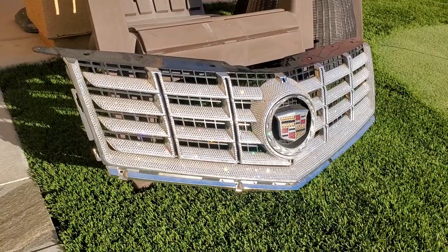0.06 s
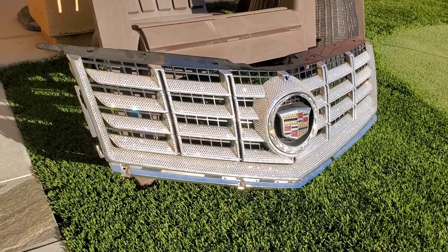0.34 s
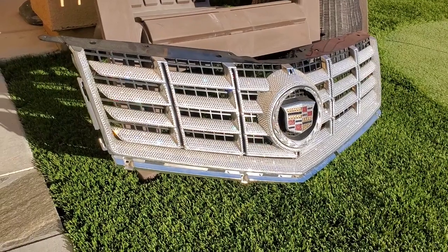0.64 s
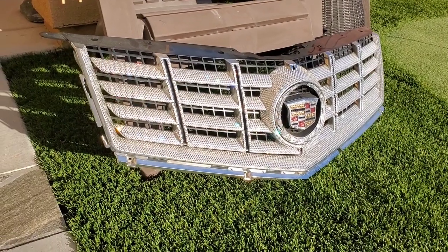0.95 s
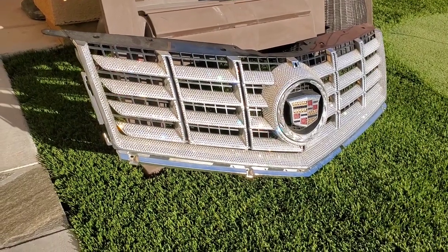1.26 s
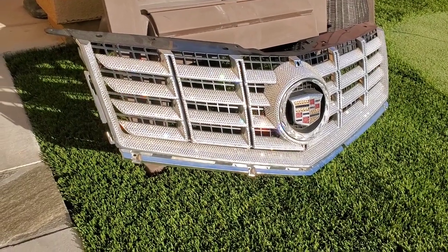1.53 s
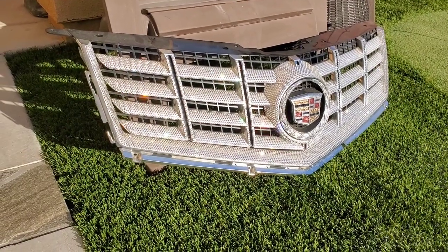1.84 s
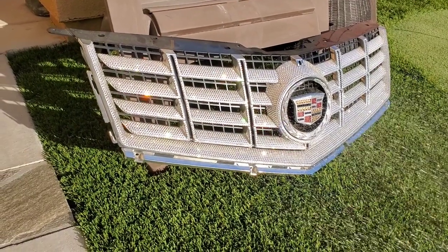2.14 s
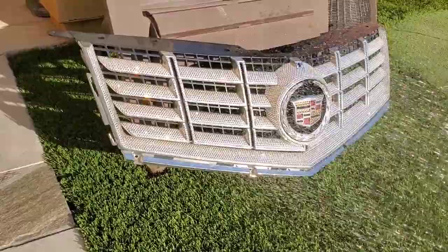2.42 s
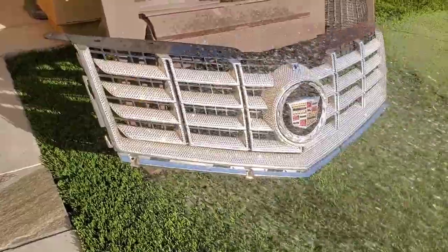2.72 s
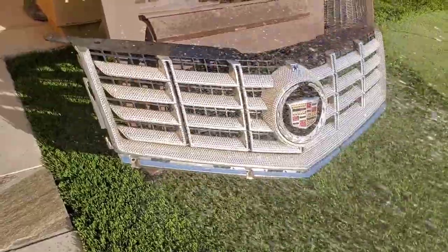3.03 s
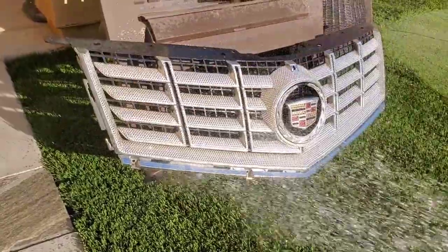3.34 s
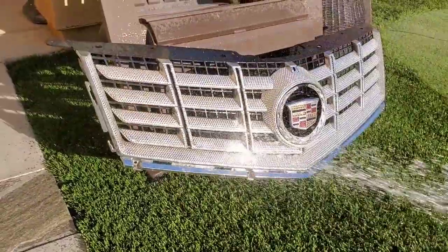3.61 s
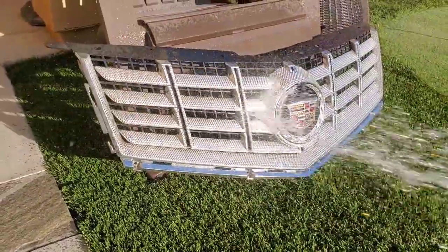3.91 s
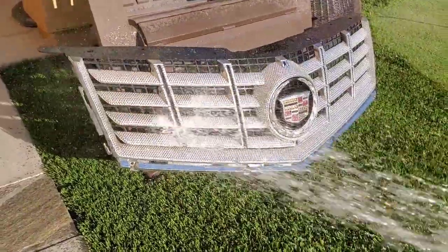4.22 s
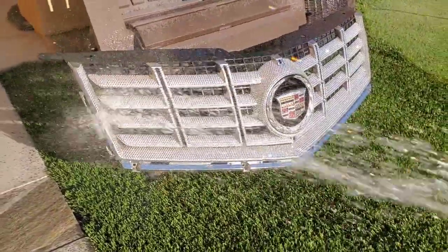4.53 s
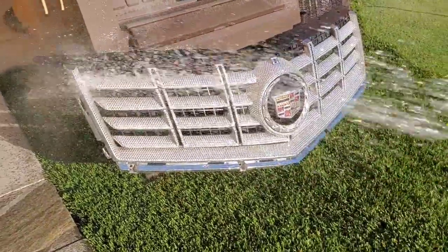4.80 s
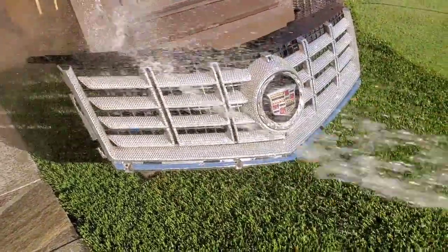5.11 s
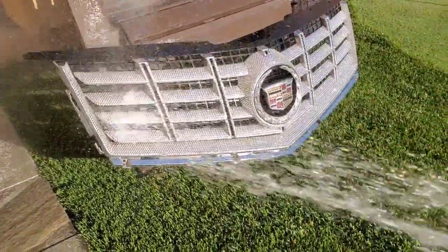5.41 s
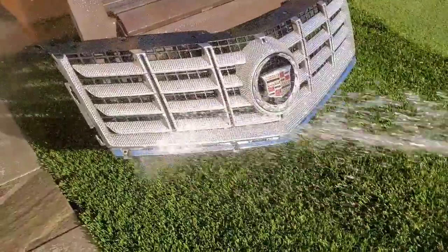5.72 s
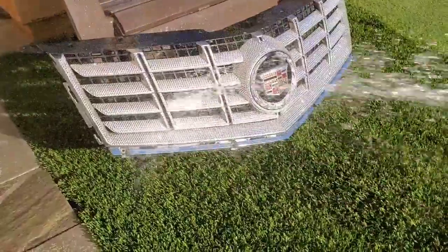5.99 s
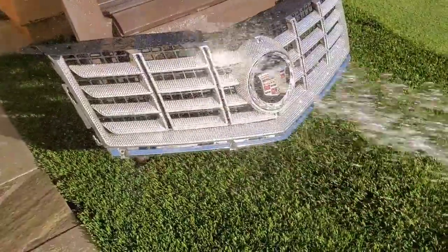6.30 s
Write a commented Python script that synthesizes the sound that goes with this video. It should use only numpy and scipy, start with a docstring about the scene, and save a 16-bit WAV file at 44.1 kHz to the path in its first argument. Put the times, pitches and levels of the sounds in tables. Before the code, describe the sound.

At first there is only light wind on the microphone and distant traffic, with a very faint rustle of a hand on a hose. At about 0.9 seconds a nozzle, close and to the right, spits and sputters. The hose whistles faintly, spurts sharply at 1.4 seconds, then hums low until about 1.8. A soft shower patters on artificial turf under a fizzy mist, slowly growing. At 2.7 seconds the nozzle turns with a hissing spurt and a momentary break, and the spray continues finer. Around 3.4 seconds more spurts lead into a narrow jet with a high, almost whistling hiss. By 4 seconds it lands fully on a hollow plastic car grille, louder, pulsing as it sweeps, splattering on the slats and drumming in the gaps. A few big drops tick sharply between 4.1 and 5.3 seconds. The jet continues until the end, at about 6.4 seconds.

```python
"""A yard with artificial turf; a stereo microphone stands close to a garden hose, nozzle to its right.
The valve opens, the hose sings briefly, and the nozzle spurts as it turns through three settings.
A soft shower patters on the turf under a fizz of mist; then a narrow jet sweeps over a hollow
plastic car grille, hissing on the slats and drumming in the gaps between them.
Behind it all, light air on the microphone and traffic in the distance."""
import sys
import numpy as np
from scipy import signal
from scipy.fft import rfft, irfft
from scipy.io import wavfile
from scipy.ndimage import uniform_filter1d

SR = 44100
rng = np.random.default_rng(int(sys.argv[2]) if len(sys.argv) > 2 else 0)


def unload_wav(signal):
    """Save mono or channel-first audio to the path in sys.argv[1] as 16-bit WAV at rate SR, clipped to [-1, 1]."""
    wavfile.write(
        sys.argv[1],
        SR,
        np.round(np.clip(np.atleast_2d(signal).T, -1, 1) * 32767).astype(np.int16),
    )


N = 280035
TIME, HZ = np.arange(N) / SR, np.fft.rfftfreq(N, 1 / SR)

# resonances of the plastic grille: f/Hz, width/Hz, boost/dB
GRILLE_MODES = [(203, 28, 3.5), (290, 33, 2), (430, 36, 2), (2025, 91, 5.5), (13600, 500, 2.5)]
# the splash moves across the microphone as the jet sweeps: t/s, left minus right/dB
JET_PAN = [(3.45, -3.5), (3.8, 0.5), (4.2, -0.5), (4.7, -1.5), (5.2, -3), (5.7, -0.5), (6.3, -2)]
# the jet catches a gap between slats: t/s, half-length/s, ring level/dB, f/Hz, half-width/Hz, thud/dB
GAP_SPLATS = [(3.702, .025, -33, 3300, 1200, -60), (3.92, 0.087, -31, 3600, 1500, -58),
              (4.065, 0.037, -28.5, 2500, 1100, -44), (4.221, 0.027, -26, 2550, 800, -47),
              (4.379, 0.056, -32.5, 2340, 900, -54), (4.475, 0.024, -30.5, 1874, 180, -52),
              (4.523, 0.028, -28.5, 2440, 350, -50), (4.743, 0.038, -31.5, 2700, 1300, -55),
              (4.796, 0.019, -29.5, 2020, 300, -35), (5.034, 0.037, -35, 2200, 1400, -35.5),
              (5.22, .026, -29.5, 1670, 1190, -37.5), (5.399, .015, -35, 2110, 120, -55),
              (5.471, 0.013, -30, 2560, 1500, -33.5), (5.93, 0.02, -26.5, 2300, 900, -45),
              (6.327, .012, -32, 1730, 130, -50)]
# single big drops: t/s, level/dB, left minus right/dB
BIG_DROPS = [(2.636, -24, -10), (2.8754, -40, -19.5), (2.968, -27, -13), (4.1396, -7, 1), (4.761, -14, -4),
             (4.997, -10, -7), (5.14, -15, -14), (5.341, -20, -1)]
# flow through the shower head, one curve for each setting: t/s, level/dB
SHOWER_FLOW = [
    [(0.98, -43), (1.186, -60.5), (1.29, -48.5), (1.312, -39), (1.34, -38.5)],
    [(1.42, -36.5), (1.648, -36), (2.606, -29.5), (2.7, -30.5)],
    [(2.8, -36.5), (3.102, -34.5), (3.192, -36), (3.42, -35.5)],
]
# spurts as the nozzle turns: t/s, level/dB, rise/s, hold/s, decay/s, narrowness of the opening (0-1)
NOZZLE_SPURTS = [(0.916, -25, 0.0087, 0.014, 0.013, 0.22), (0.94, -29, 0.0013, .002, 0.0054, 0.),
                 (0.96, -38, .01, .02, 0.067, 0.), (1.055, -39, .002, .002, 0.0032, 0.1),
                 (1.3654, -18, 0.0043, 0.0022, 0.0098, 0.4), (1.384, -38, .01, .015, .02, .6),
                 (2.709, -19.7, .014, 0.037, 0.041, 0.84), (3.439, -23.5, .016, .018, 0.024, 0.6),
                 (3.498, -25, 0.037, 0.06, 0.034, .85)]
# the hose whistles, then hums, as the flow picks up: t/s, f/Hz, level/dB
HOSE_WHISTLE = [(1.07, 477, -60), (1.11, 493, -51), (1.146, 516, -62), (1.176, 533, -50.5),
                (1.312, 524, -53), (1.36, 537, -75)]
HOSE_HUM = [(1.51, 228, -62), (1.545, 213.6, -37.5), (1.585, 188.5, -31), (1.63, 186.3, -32),
            (1.70, 187, -39), (1.77, 192, -50)]
# the hose is taken in hand: t/s, half-length/s, level/dB
HAND_RUSTLES = [(.335, 0.0046, -67), (.395, .04, -69), (0.635, .007, -66)]
# spectrum of each source at the microphone: f/Hz, relative level/dB
JET_SPECTRUM = [(30, -11), (80, -8), (450, -12), (800, -11.5), (1400, -12), (2000, -10.5), (2800, -9.5),
                (4800, 2.5), (5900, -1), (7200, -1.5), (8600, -10.5), (11200, -6.5), (12500, -2),
                (15700, -2)]
SHOWER_SPECTRUM = [(30, -2), (90, 0), (230, 3), (380, 0), (720, 0), (1200, -6.5), (2100, -7), (3100, -9),
                   (4300, -6.5), (6700, -9.5), (8200, -16), (10900, -17), (12400, -5.5), (14000, -4),
                   (15800, -12.5)]
WIDE_SPECTRUM = [(200, -14), (500, -8.5), (1000, -9), (2000, -9.5), (3200, -6), (5000, -3.5), (6600, 5.5),
                 (7400, -1), (8600, -4), (10800, -7), (12400, 1), (15800, -3.5)]
NARROW_SPECTRUM = [(200, -44), (1500, -22.5), (5000, -22), (7000, -1.5), (9500, -2), (10900, -7),
                   (12400, 11), (14200, 8), (15800, -4)]
YARD_SPECTRUM = [(20, -4), (40, -5.5), (70, 2.5), (140, -2.5), (200, -6), (420, -17), (850, -10.5),
                 (1400, -22), (2050, -24), (3000, -32.5), (4400, -28.5), (5300, -33.5), (7000, -34),
                 (8500, -50), (15800, -51)]
# how each place reaches the two capsules: f/Hz, left minus right/dB, coherence (0-1)
FROM_NOZZLE = [(100, -8.5, 1), (500, -6.5, 0.65), (1810, -4, 0.74), (4000, -5, 0.52), (5740, -9, 0.31),
               (7060, -2, 0.3), (9300, -7, 0.1), (10700, -2, 0.071), (12300, -16, 0.18), (15500, -9, 1)]
FROM_YARD = [(30, 0, .1), (60, -0.31, 0.82), (254, 1, 0.9), (700, 1, 0.093), (8000, -2, .1)]
# the same for the grille, with a fourth column: left phase lead/rad
FROM_GRILLE = [(100, -9, 1, -1), (448, -6.5, 0.89, -1), (900, -6.5, 0.11, 0.4), (1090, -1, 0.14, 1.06),
               (1970, -1, 0.45, 1.0), (3220, 1, 0.38, 2.5), (5070, -5.5, 0.25, 0.5),
               (6050, -8.5, 0.24, 2.8), (7240, 0, 0.077, -3), (9600, -5, 0.1, -3.5),
               (15500, -3.5, 0.053, -0.5)]

NOZZLE_LAG_S = 0.000465  # the left capsule hears the nozzle later
CUT_S, CUT_LENGTH_S, CUT_DB = 2.748, 0.021, -16  # the turning head blocks the shower for an instant
JET_S, JET_BUILD_S = 3.44, 0.54  # the jet forms, then takes a while to land fully on the grille
WAG_HZ, WAG_PEAK_S = 4.21, 5.045  # the hand wags the jet to and fro across the slats
MISS_S, MISS_LENGTH_S = 5.14, 0.082  # the jet slips past the edge of the grille


def jet(gap_db=3.5, pings_db=-6):
    """The jet breaks into slugs that thud on the grille, ring its gaps and shatter into hiss."""
    body = gain_of(sum(db / (1 + (2 * (HZ - hz) / width) ** 2) for hz, width, db in GRILLE_MODES))
    landing = np.clip((TIME - JET_S) / JET_BUILD_S, 0, 1)
    wag = landing * np.cos(2 * np.pi * WAG_HZ * (TIME - WAG_PEAK_S))

    def on_grille(water):
        """Water heard through the resonances of the grille."""
        return place(irfft(rfft(water) * body, N), JET_SPECTRUM, FROM_GRILLE)

    def force(landed_db, first_db, wag_db, miss_db, rise_s):
        """A layer grows as the jet lands, pulses with the hand and drops where the jet misses."""
        aim_db = first_db * (1 - landing) + wag_db * wag + miss_db * swell(MISS_S, MISS_LENGTH_S)
        return gain_of(landed_db + aim_db - 60 * np.maximum(JET_S - TIME, 0) / rise_s)

    def gaps(hz, t):
        """The gap under the jet resonates, and its water film keeps changing."""
        gap_hz = np.interp(t, [3.85, 4.45], [3800, 2200])  # lower as the jet moves from the turf onto the grille
        octaves_off = np.log2((hz + 1) / gap_hz)
        return gap_db / (1 + octaves_off ** 2) + 1.63 * patches(hz, t, width_hz=1500, length_s=0.13)

    def flutter(hz, t):
        """The stream wobbles, so the hiss flutters as a whole and in narrow patches."""
        whole = patches(hz, t, width_hz=27000, length_s=0.058)
        return .9 * whole + 2.1 * patches(hz, t, width_hz=400, length_s=.03)

    slugs = on_grille(drops(per_s=970, spread_db=-0.5, splash_s=0.00066, wash=1))
    splash = on_grille(drops(per_s=2900, spread_db=2.5, splash_s=0.00027, wash=1))
    hollow = unit(shaped(band(slugs, 1200, 3850) + gain_of(pings_db) * air_pockets(), gaps))
    drum = hollow * force(-32, first_db=-6, wag_db=-0.2, miss_db=-6, rise_s=0.16)
    blow_power = sum((gain_of(db) * swell(s, length_s)) ** 2 for s, length_s, *_, db in GAP_SPLATS)
    push = force(-40.5, first_db=-6.5, wag_db=1.5, miss_db=0, rise_s=0.11)
    thud = band(slugs, 54, 1210) * np.sqrt(blow_power + push ** 2)
    spray = band(shaped(splash, flutter), 6080, 13500)
    hiss = spray * force(-25.5, first_db=-3.5, wag_db=0.9, miss_db=-2, rise_s=0.75)
    pan_db = np.interp(TIME, *np.transpose(JET_PAN))
    return (thud + drum + hiss) * gain_of(np.array([pan_db, -pan_db]) / 2)


def air_pockets(count=40, each_per_s=7, spread_db=3, ring_s=0.016, low_hz=1650, high_hz=4600):
    """Air shut in between slats and water pings, each pocket at its own pitch; high ones die sooner."""
    t, out = np.arange(SR // 16) / SR, np.zeros((2, N))
    attack = 1 - np.exp(-t / 0.00018)
    for hz in np.geomspace(low_hz, high_hz, count):
        size = gain_of(spread_db * np.minimum(rng.exponential(1, N), 3))
        hits = size * (rng.random(N) < each_per_s / SR)
        left_lead = np.array([[0.49 + 0.28 * rng.standard_normal()], [0]])
        ring = np.sin(2 * np.pi * hz * t + left_lead) * np.exp(-t * hz / low_hz / ring_s) * attack
        out += signal.oaconvolve(hits[None], ring, axes=1)[:, :N]
    return unit(out * gain_of([[-1.5], [0]]))


def splats():
    """A slug of water fills one gap of the grille, which rings for a moment."""
    water = place(drops(per_s=900, spread_db=1.8, splash_s=0.00044, wash=1), JET_SPECTRUM, FROM_GRILLE)
    spectrum = rfft(band(water, 1300, 4500))
    out = np.zeros((2, N))
    for s, length_s, db, pitch_hz, width_hz, _ in GAP_SPLATS:
        ring = irfft(spectrum / (1 + ((HZ - pitch_hz) / width_hz) ** 2), N)
        out += gain_of(db) * unit(ring) * swell(s, length_s)
    return out


def bore(settled_hz=5917, sharp_hz=300, settle_s=.45, width_hz=800, octave_db=-17):
    """Fast water in the narrow bore makes a focused, almost whistling hiss with a weak octave."""
    def resonance(hz, t):
        """Two steep peaks that sink as the opening clears."""
        pitch_hz = settled_hz + sharp_hz * np.exp(-np.maximum(t - JET_S, 0) / settle_s)
        first, octave = (1 / (1 + ((hz - k * pitch_hz) / width_hz) ** 2) ** 2 for k in (1, 2))
        peaks_db = 20 * np.log10(first + gain_of(octave_db) * octave)
        return peaks_db - 2 * patches(hz, t, width_hz=91, length_s=0.037)

    water = drops(per_s=2300, spread_db=3, splash_s=0.00035, wash=0.98)
    rush = place(water, JET_SPECTRUM, FROM_GRILLE)
    # soft while the head is still turning, full once the jet has landed
    opening = level(s=[3.31, JET_S, JET_S + 0.045, JET_S + JET_BUILD_S, TIME[-1]],
                    db=[-37, -37, -31.5, -31, -31], rise_s=0.22, fall_s=1)
    return unit(shaped(rush, resonance)) * opening


def snaps(decay_s=0.00076):
    """Single large drops burst with a sharp tick."""
    bursts = np.zeros((2, N))
    for s, db, pan_db in BIG_DROPS:
        sides = gain_of(db + np.array([[pan_db], [-pan_db]]) / 2)
        bursts += sides * (TIME >= s) * np.exp(-abs(TIME - s) / decay_s)
    crack = irfft(rfft(rng.standard_normal((2, N))) * gain_of(over_hz(WIDE_SPECTRUM)[0]), N)
    return bursts * band(crack, 3800, 19000)


def shower(patter_db=-2.5):
    """Many soft drops land on the turf: a dull patter with a sizzle above it, both following the flow."""
    rain = at_nozzle(drops(per_s=2800, spread_db=1, splash_s=0.00013, wash=1.9), SHOWER_SPECTRUM)
    rain = shaped(rain, lambda hz, t: 0.85 * patches(hz, t, width_hz=590, length_s=0.026))
    landed = np.interp(TIME, [.9, 1.5], [.6, 1])  # the first water takes a while to reach the ground
    patter = gain_of(patter_db) * landed * band(rain, 44, 780)
    sizzle = band(rain, 1030, 8200)
    flow = level(*np.vstack(SHOWER_FLOW).T, rise_s=0.41, fall_s=0.1)
    blocked = gain_of(CUT_DB * swell(CUT_S, CUT_LENGTH_S))
    return flow * blocked * (patter + sizzle)


def mist(leak_s=0.833, leak_db=-48.5, spray_db=-31, growth=1.2, finer_db=2, body_db=-9):
    """Fine spray tears off the nozzle with a prickly hiss: a steady leak, more as the flow grows."""
    s, flow_db = np.vstack(SHOWER_FLOW).T
    fizz = at_nozzle(drops(per_s=2500, spread_db=4, splash_s=.0003, wash=1.5), SHOWER_SPECTRUM)
    leak = level([leak_s, JET_S], [leak_db, leak_db], rise_s=.17, fall_s=.1)
    turned = TIME > CUT_S
    torn = level(s, spray_db + growth * (flow_db - flow_db.max()), rise_s=.1, fall_s=.2)
    torn *= gain_of(finer_db * turned)
    body = gain_of(body_db) * (leak + torn * turned) * band(fizz, 2460, 4900)
    return band(fizz, 7700, 18000) * np.hypot(leak, torn) + body


def spurts(sputter_db=1.5):
    """Water squeezes through a half-open port: the narrower it is, the higher the hiss."""
    spit = drops(per_s=900, spread_db=1.5, splash_s=.0007, wash=.6)
    spit *= gain_of(sputter_db * wobble(samples=200))  # air in the line
    wide = at_nozzle(spit, WIDE_SPECTRUM) * gain_of([[1.5], [-.5]])
    narrow = at_nozzle(spit, NARROW_SPECTRUM) * gain_of([[-4.5], [.8]])
    out = np.zeros((2, N))
    for s, db, rise_s, hold_s, decay_s, narrowness in NOZZLE_SPURTS:
        rise = np.clip((TIME - s) / rise_s, 0, 1)
        decay = np.exp(-np.maximum(TIME - s - rise_s - hold_s, 0) / decay_s)
        out += gain_of(db) * rise * decay * ((1 - narrowness) * wide + narrowness * narrow)
    return out


def hose_tone(curve, waver=.01):
    """Flow through the valve sets a slightly unsteady pure tone going in the hose."""
    s, hz, db = np.transpose(curve)
    pitch_hz = np.interp(TIME, s, hz) * (1 + waver * wobble(samples=400))
    lag_turns = np.array([[NOZZLE_LAG_S], [0]]) * hz.mean()
    tone = np.sqrt(2) * np.sin(2 * np.pi * (np.cumsum(pitch_hz) / SR - lag_turns))
    return tone * level(s, db, rise_s=0.074, fall_s=.08) * gain_of([[-2], [2]])


def rustles():
    """A hand takes up the hose: dry little scrapes before the water comes."""
    grit = place(drops(per_s=500, spread_db=6, splash_s=.0006, wash=.6), SHOWER_SPECTRUM, FROM_YARD)
    touches = sum(gain_of(db) * swell(s, length_s) for s, length_s, db in HAND_RUSTLES)
    return band(grit, 3200, 9500) * touches


def yard(level_db=-48, gust_db=2):
    """Light air on the microphone, in small gusts, and far traffic."""
    def gusts(hz, t):
        """The gusts stir mostly the low end."""
        return gust_db * patches(hz, t, width_hz=1100, length_s=0.18) / (1 + hz / 500)

    air = place(rng.standard_normal((2, N)), YARD_SPECTRUM, FROM_YARD)
    return gain_of(level_db) * shaped(air, gusts)


def drops(per_s, spread_db, splash_s, wash):
    """Drops of uneven size, each a tiny noise burst, over a wash of countless finer ones."""
    size = gain_of(spread_db * np.minimum(rng.exponential(1, N), 5))
    hits = size ** 2 * (rng.random(N) < per_s / SR)
    power = signal.lfilter([1], [1, -np.exp(-1 / (splash_s * SR))], hits)
    return np.sqrt(wash + power / power.mean()) * rng.standard_normal((2, N))


def place(pair, spectrum, path, lag_s=0):
    """Colours two unrelated signals and spreads them over the capsules, at unit level."""
    balance_db, coherence, *lead = over_hz(path)
    balance = gain_of(balance_db)
    right, unrelated = rfft(pair)
    turn = np.exp(1j * (sum(lead) - 2 * np.pi * HZ * lag_s))
    left = (coherence * right + np.sqrt(1 - coherence ** 2) * unrelated) * turn * balance
    colour = gain_of(over_hz(spectrum)[0]) / np.hypot(1, balance)
    return unit(irfft(np.array([left, right]) * colour, N))


def at_nozzle(pair, spectrum):
    """Places a sound close by, to the right of the microphone."""
    return place(pair, spectrum, FROM_NOZZLE, NOZZLE_LAG_S)


def over_hz(table):
    """Each column of a table, interpolated over log frequency."""
    hz, *columns = np.transpose(table)
    return [np.interp(np.log(HZ + 1), np.log(hz + 1), column) for column in columns]


def band(pair, low_hz, high_hz):
    """One band of a pair, at unit level."""
    power = 1 / (1 + (low_hz / (HZ + 1)) ** 10) / (1 + ((HZ + 1) / high_hz) ** 10)
    return unit(irfft(rfft(pair) * np.sqrt(power), N))


def shaped(pair, field_db):
    """Applies a gain that is a function of frequency and time."""
    hz, s, frames = signal.stft(pair, SR, nperseg=512, noverlap=384)
    frames *= gain_of(field_db(hz[:, None], s))
    return signal.istft(frames, SR, nperseg=512, noverlap=384)[1][:, :N]


def patches(hz, s, width_hz, length_s):
    """Smooth random patches over frequency and time, of rms 1."""
    shape = len(hz), len(s)
    noise = np.fft.rfft2(rng.standard_normal(shape))
    across = np.fft.fftfreq(len(hz), hz[1, 0])[:, None] * width_hz
    along = np.fft.rfftfreq(len(s), s[1]) * length_s
    return evened(np.fft.irfft2(noise / (1 + (2 * across) ** 2 + (2 * along) ** 2), shape))


def wobble(samples):
    """Noise smoothed over so many samples, of rms 1."""
    return evened(uniform_filter1d(rng.standard_normal(N), samples))


def level(s, db, rise_s, fall_s):
    """Gain along a dB curve; outside it the sound fades by 60 dB in the given times."""
    outside = np.maximum(s[0] - TIME, 0) / rise_s + np.maximum(TIME - s[-1], 0) / fall_s
    return gain_of(np.interp(TIME, s, db) - 60 * outside)


def swell(s, length_s):
    """A smooth bump of height 1 around a moment."""
    return np.exp(-((TIME - s) / length_s) ** 2)


def gain_of(db):
    """Decibels to amplitude."""
    return 10 ** (np.asarray(db) / 20)


def evened(x):
    """Scales to rms 1."""
    return x / np.sqrt(np.mean(x ** 2) + 1e-20)


def unit(pair):
    """Scales a stereo pair so that its centre has rms 1."""
    return pair / (np.std(pair.mean(0)) + 1e-12)


def scene():
    """All sources as they reach the microphone, in the open air."""
    nozzle = mist() + spurts() + bore() + hose_tone(HOSE_WHISTLE) + hose_tone(HOSE_HUM)
    return yard() + rustles() + nozzle + shower() + jet() + splats() + snaps()


def record(dry, open_s=.097, ceiling=.82, top_hz=16050):
    """The microphone opens after a moment, rounds off the highest peaks and loses the top treble."""
    opened = dry * np.clip((TIME - open_s) * SR / 128, 0, 1)
    rounded = opened / (1 + (opened / ceiling) ** 6) ** (1 / 6)
    lowpass = signal.firwin(511, top_hz, window=("kaiser", 9), fs=SR)
    return signal.oaconvolve(rounded, lowpass[None], "same")


dry = scene()
out = record(dry)
unload_wav(out)
```